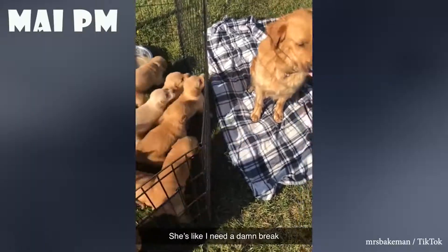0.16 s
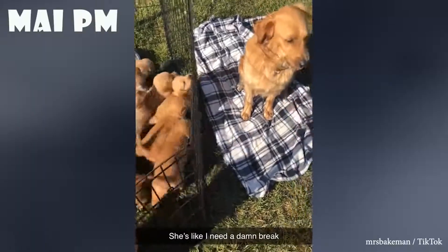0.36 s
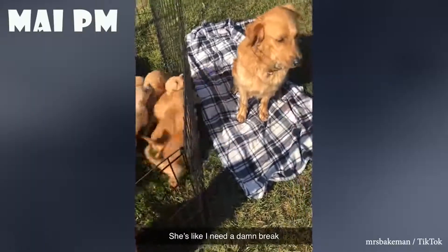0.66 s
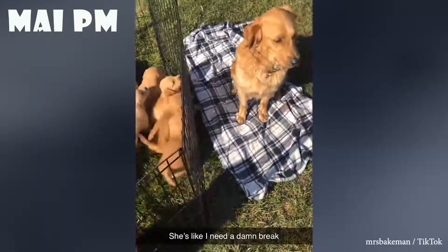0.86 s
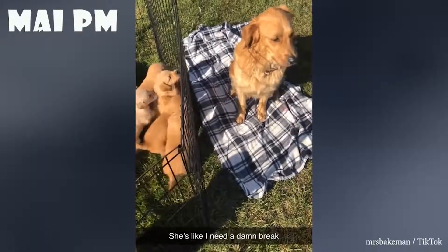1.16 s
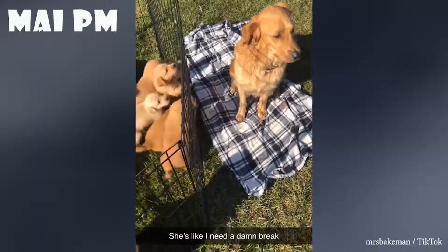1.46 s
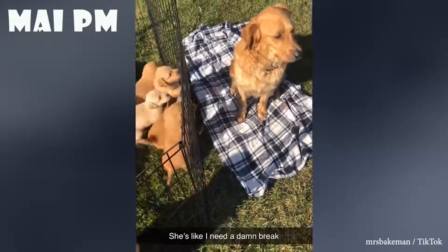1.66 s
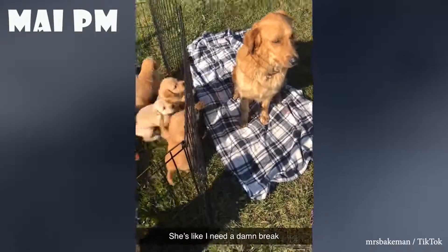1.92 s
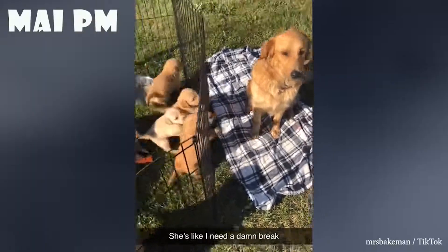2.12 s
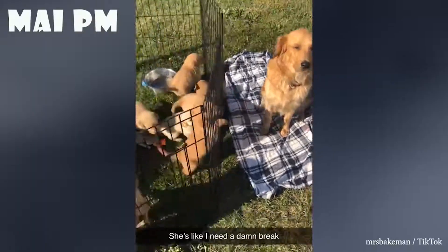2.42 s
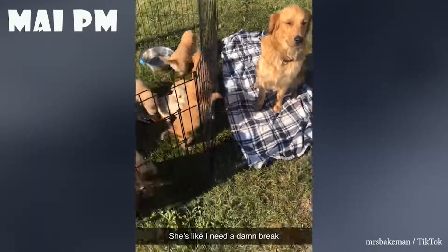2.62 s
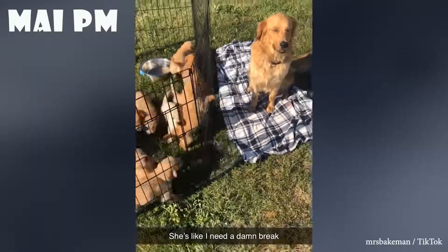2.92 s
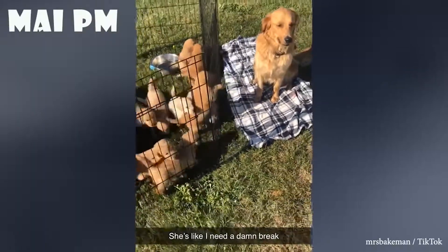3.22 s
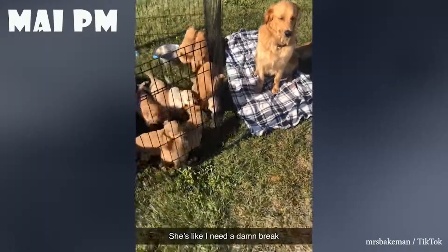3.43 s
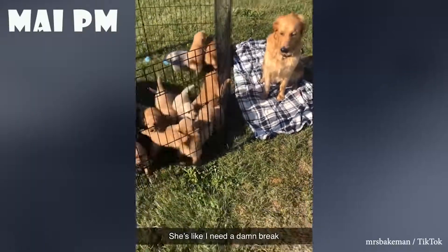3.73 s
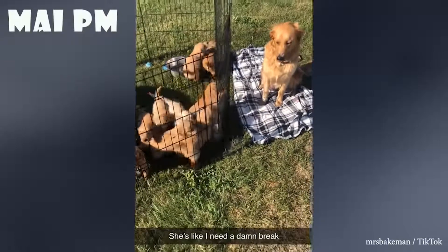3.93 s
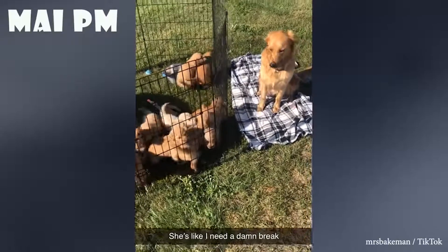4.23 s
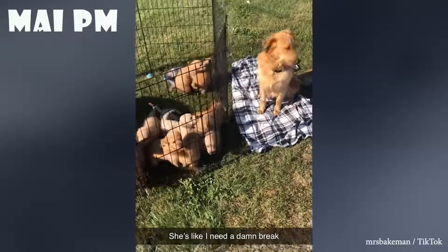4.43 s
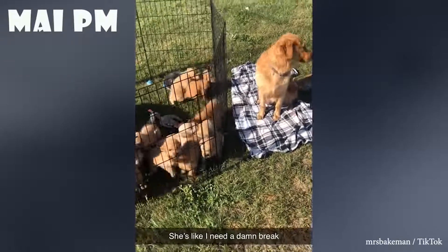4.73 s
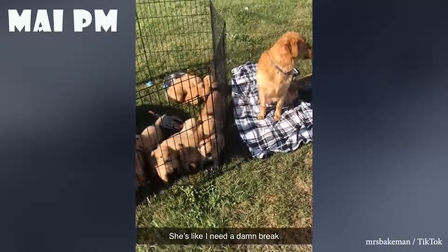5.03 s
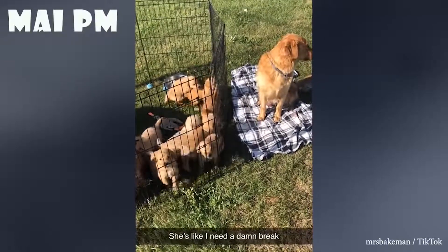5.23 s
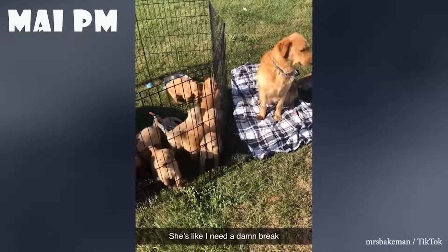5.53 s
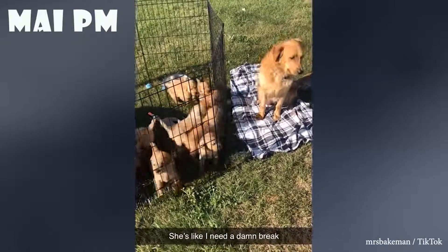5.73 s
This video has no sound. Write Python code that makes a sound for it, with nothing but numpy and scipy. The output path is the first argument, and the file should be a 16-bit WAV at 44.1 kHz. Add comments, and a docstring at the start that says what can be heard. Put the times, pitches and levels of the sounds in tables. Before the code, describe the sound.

Outdoors, close to a wire pen, a handheld microphone picks up overlapping puppy squeaks and whimpers. Whines crowd together early, grow louder and hoarser at about two and a half seconds, then continue in longer plaintive cries. Thin, very high nasal whistles, breathy hiss and muffled pawing sit beneath, with quiet lawn ambience, light wind buffeting and a late thump with a scrape.

```python
"""A litter of puppies whines in a wire pen on a lawn, several at a time, with softer whimpers behind. Each
whine is a near-pure arch of pitch that gains overtones as the mouth opens; some rasp into rattling noise, and
thin second tones of the voice, very high and wavering, sound among them. High breathy noise hisses through
their noses and paws shuffle dully; near the end damped tones thump and noise scrapes close by. Low noise bumps
the microphone in gusts over the steady hush of the lawn."""
import sys
import numpy as np
from scipy import signal
from scipy.fft import rfft, irfft, next_fast_len
from scipy.io import wavfile
from scipy.ndimage import uniform_filter1d

SR = 44100
rng = np.random.default_rng(int(sys.argv[2]) if len(sys.argv) > 2 else 0)


def waveform_to_disk(signal):
    """Save audio, clipped to [-1, 1], as 16-bit WAV at the path in sys.argv[1]."""
    frames = np.transpose(np.atleast_2d(signal))
    scaled = np.clip(frames, -1, 1) * 32767
    samples = np.round(scaled).astype(np.int16)
    wavfile.write(sys.argv[1], SR, samples)


N = 258778
TIME = np.arange(N) / SR  # s

# Outdoor hush of the lawn. Each row: frequency in Hz, relative density in dB per Hz.
LAWN_COLOUR = [(30, 15), (250, 8), (550, 2), (1200, -2), (1900, 0), (2550, -12.5), (3300, -6), (4300, -1),
               (6500, -9), (9500, -62), (13000, -30)]
# Wind at the microphone. Each row: frequency in Hz, relative density in dB per Hz.
WIND_COLOUR = [(15, -14), (35, 3), (70, 0.5), (110, -7.5), (170, -21), (300, -44.5), (700, -71),
               (2000, -100)]
# Gusts on the microphone. Each row: start in seconds, length in seconds, level in dB.
GUSTS = [(.02, 0.24, -34), (.36, 0.31, -37), (.72, 0.15, -32), (1.04, 0.16, -38.5), (1.26, 0.51, -33),
         (1.7, .21, -37.5), (2.26, 0.16, -41.5), (2.65, 0.11, -35.5), (2.84, 0.11, -31), (2.98, 0.2, -47),
         (3.46, 0.12, -47.5), (4.84, 0.066, -32), (5.05, .14, -34), (5.19, 0.2, -41.5), (5.79, 0.11, -45)]
CALM_DB, GUST_EDGE_S = -55, 0.075  # the breeze between gusts; how long a gust takes to swell and fade

# Paws on the ground. Each row: frequency in Hz, relative density in dB per Hz.
SHUFFLE_COLOUR = [(100, -2.5), (250, -11.0), (520, 3.0), (900, -3), (2500, -30.0)]
# Bouts of shuffling paws. Each row: start in seconds, length in seconds, level in dB.
SHUFFLES = [(.25, 0.76, -57.5), (1.8, 0.37, -55), (2.75, 0.5, -55.5), (3.3, 0.54, -62.5), (4.1, 0.56, -55),
            (5.56, 0.44, -53)]
FAINT_SHUFFLE_DB, SHUFFLE_EDGE_S = -66.5, 0.1
# Breath through the puppies' noses. Each row: frequency in Hz, relative density in dB per Hz.
NOSE_HISS_COLOUR = [(2500, -30), (4000, -19), (6500, 6), (9500, 7), (11500, 6), (13000, -1)]
# Swells of high breathy hiss through the noses.
# Each row: start in seconds, length in seconds, level in dB before the trim.
NOSE_HISSES = [(0, 0.18, -46.5), (.19, 0.11, -46.5), (.47, 0.23, -44.5), (.89, 0.32, -48),
               (1.25, 0.44, -48.5), (1.85, 0.14, -46.5), (2.15, 0.19, -41.5), (2.33, 0.25, -53),
               (2.84, 0.083, -44), (3.1, 0.12, -48.5), (3.42, 0.14, -44.5), (3.75, 0.12, -61),
               (4.1, 0.16, -45), (4.42, 0.08, -45), (4.7, .14, -41.5), (5.03, 0.18, -42), (5.38, 0.17, -47),
               (5.55, 0.3, -47.5)]
FAINT_NOSE_HISS_DB, NOSE_HISS_EDGE_S = -56.5, 0.066  # the resting level is before the trim too

# The scrape close by. Each row: frequency in Hz, relative density in dB per Hz.
SCRAPE_COLOUR = [(150, -5.5), (500, 10.5), (800, 1), (1800, -4.5), (3000, -11.5), (5200, 3.5), (7000, -2.5),
                 (9000, 0), (13000, -8.5)]
# The scrape's force. Each row: time in seconds, mean level in dB.
SCRAPE_FORCE = [(5.775, -57), (5.79, -25), (5.81, -19.5), (5.84, -28.5), (5.87, -28.5)]
# Dull thumps. Each row: start in seconds, level in dB before the soft attack, pitch in Hz, 60 dB decay in seconds.
THUMPS = [(5.752, -4.5, 274, 0.068), (5.789, -21.5, 258, 0.25), (5.803, -7, 780, 0.035),
          (5.806, -18, 538, 0.086)]

# Thin, very high second tones of the voice. Each row: start in seconds, length in seconds, settled pitch in Hz,
# mean level in dB.
WHISTLES = [(0.134, 0.031, 8180, -32.5), (0.422, 0.097, 9960, -43), (0.643, 0.034, 8240, -41.5),
            (2.122, 0.23, 9620, -46.5), (2.733, 0.055, 8370, -36), (2.812, 0.051, 8280, -35),
            (2.894, 0.022, 8160, -44), (4.036, 0.048, 9700, -51.5), (5.588, 0.052, 9570, -41),
            (5.634, 0.076, 7970, -43.5)]
# Hoarse moments. Each row: middle in seconds, length in seconds, noise level in dB at the middle.
RASPS = [(0.773, 0.072, -50), (1.075, 0.098, -50), (1.455, 0.071, -43), (1.965, 0.11, -36.5),
         (2.567, 0.085, -35), (2.95, 0.13, -36), (3.089, 0.083, -41.5), (3.374, 0.16, -35.5),
         (3.72, 0.09, -38.5), (4.089, 0.15, -46), (4.439, 0.18, -46), (4.569, 0.067, -45),
         (5.685, 0.13, -45)]
# The colour of a rasp. Each row: frequency in Hz, relative density in dB per Hz.
HOARSE_COLOUR = [(400, -6), (800, -5), (1200, 4), (1650, -1.5), (2100, 7), (2550, -6.5), (3300, -1),
                 (4000, -0.5), (4900, -10.5), (5900, -22), (7500, -27)]
RASP_BEND = 2.13  # how gently a rasp swells and fades

# The whines. Each row: start in seconds, length in seconds, rise in seconds, first pitch in Hz, crest in Hz,
# sagged pitch in Hz, final drop as a share of the pitch, hardest push in seconds after the start,
# fundamental in dB, its gain in the push in dB, widest mouth in seconds after the start,
# overtones in dB, their gain then in dB, nasal treble in dB. Onset, fade and trims come on top.
WHINES = [(-0.028, 0.16, 0.042, 1585, 1348, 1400, 0.085, 0.035, -28, 8, 0.004, -54, 6, 0),
          (-0.01, 0.092, 0.074, 1125, 1233, 1190, 0.071, 0.095, -37, 14.5, 0, -52.5, 3, 2),
          (0.144, 0.13, 0.12, 970, 1275, 1214, 0, 0.112, -34, 2.5, 0.106, -53, 10.5, 9),
          (0.179, 0.074, 0.015, 1132, 1195, 952, 0.0, 0.077, -36.5, 13, 0.074, -72, 3, 0),
          (0.253, 0.4, 0.102, 921, 1393, 1445, 0.12, 0.003, -28.5, 5.5, 0.3, -53.5, 8.5, 8.5),
          (0.296, 0.1, 0.029, 988, 734, 454, 0.017, 0.0, -39, 9, 0.018, -69, 17, 0),
          (0.389, 0.067, 0.067, 1120, 1535, 1400, 0.072, 0.0, -31.5, 6.5, 0.082, -61, 9, 0),
          (0.428, 0.25, 0.11, 1071, 1467, 1436, 0.22, 0.066, -32, 9.5, 0.069, -52.5, 11.5, 14),
          (0.486, 0.18, 0.11, 825, 1084, 980, 0.047, 0.2, -34.5, 2, 0.077, -72, 9, 0),
          (0.709, 0.19, 0.13, 1036, 1527, 1466, 0.36, 0.093, -35, 14, 0.066, -59.5, 19.5, -10),
          (0.765, 0.041, 0.047, 922, 1292, 1166, 0.0049, 0.023, -30, 3, 0, -62, 27, -2),
          (0.835, 0.19, 0.11, 1072, 1559, 1480, 0.19, 0.078, -24, 1, 0.03, -48, 6, 10),
          (0.892, 0.32, 0.21, 1135, 1350, 1281, 0.3, 0.19, -31, 7, 0.14, -60.5, 15.5, 15.5),
          (0.893, 0.29, 0.053, 1598, 1820, 1297, 0, 0.19, -36.5, 10, 0.072, -51.5, 8, 6),
          (0.906, 0.098, 0.054, 895, 1180, 1095, 0.044, 0, -50, 20, 0.055, -67, 0, 0),
          (1.028, 0.079, 0.068, 1019, 1349, 1214, 0.034, 0, -28, 5, 0.043, -55.5, 14, -5),
          (1.144, 0.027, 0.018, 1260, 1187, 894, 0.18, 0.022, -35, 6.5, 0.03, -63, 2, 0),
          (1.207, 0.19, 0.12, 1192, 1615, 1634, 0.32, 0.13, -28.5, 5.5, 0.076, -48.5, -1.5, 2.5),
          (1.269, 0.29, 0.2, 1085, 1620, 1675, 0.34, 0.15, -33, 10.5, 0.201, -58, 3, 2),
          (1.332, 0.082, 0.054, 901, 1220, 1086, 0.0, 0.082, -37.5, 12, 0.14, -67, -1, 0),
          (1.368, 0.41, 0.18, 971, 1586, 1380, 0.41, 0, -34, 8.5, 0.052, -52, 12.5, 8),
          (1.433, 0.24, 0.17, 1164, 1549, 1158, 0.23, 0.17, -37.5, 17, 0.19, -57, 10.5, 2),
          (1.558, 0.069, 0.056, 1013, 1163, 1030, 0, 0.044, -32.5, 3, 0.064, -60, 7, 3),
          (1.608, 0.061, 0.066, 800, 1047, 957, 0.016, 0.0695, -32.5, 16.5, 0.067, -61, 19, 0),
          (1.787, 0.27, 0.13, 995, 1596, 1243, 0.21, 0.13, -25, 4, 0.22, -47, 10.5, -5),
          (1.918, 0.12, 0.13, 1113, 1486, 1600, 0.0, 0.035, -27, 10, 0.059, -35.5, 5, 4),
          (2.019, 0.49, 0.17, 1540, 1577, 1259, 0.14, 0.29, -35, 10, 0.26, -50, 3.5, 7.5),
          (2.111, 0.13, 0.13, 1038, 1352, 1500, 0.36, 0.043, -31.5, 7, 0.031, -54.5, 9.5, 0),
          (2.178, 0.21, 0.08, 1010, 1441, 1380, 0.022, 0.04, -34.5, 20, 0.048, -62.5, 32.5, 16),
          (2.27, 0.13, 0.13, 1139, 1394, 1246, 0.066, 0.13, -36, 8, 0.065, -59, 2, 0),
          (2.378, 0.019, 0.006, 1164, 1098, 1020, 0.075, 0, -37, 8, 0.036, -42.5, 15, 2),
          (2.404, 0.046, 0.027, 1366, 1353, 1200, 0.034, 0.037, -31, 4.5, 0.048, -53, 12, 10),
          (2.405, 0.17, 0.12, 925, 1232, 1165, 0.0, 0.056, -37.5, 5, 0.174, -52, 14, 9),
          (2.461, 0.11, 0.069, 936, 992, 1074, 0.026, 0.087, -37.5, 7, 0.121, -49.5, 32, 7),
          (2.558, 0.23, 0.11, 939, 1410, 1250, 0.0, 0.094, -19.5, 5, 0.048, -33.5, 13, -1.5),
          (2.663, 0.086, 0.056, 893, 1165, 1000, 0.19, 0.046, -31, 3.5, 0.096, -68.5, 32, 8),
          (2.772, 0.19, 0.22, 1052, 1214, 1250, 0.0, 0.22, -35, 2, 0.11, -50.5, 4.5, -2),
          (2.773, 0.068, 0.091, 1268, 1378, 1250, 0.0, 0.00096, -30, 14, 0.01, -49.5, 17.5, -8),
          (2.92, 0.131, 0.082, 1240, 1440, 1405, 0.049, 0.27, -44, 5, 0.075, -36, -6, -26),
          (3.027, 0.25, 0.14, 900, 1454, 1384, 0.0, 0.035, -33.5, 12, 0.048, -47.5, 23.5, -15),
          (3.068, 0.13, 0.13, 632, 913, 830, 0.1, 0.045, -33, -0.5, 0.058, -56.5, 9, 0),
          (3.296, 0.19, 0.15, 1003, 1392, 1486, 0.16, 0.076, -39, 14, 0.081, -46, 12.5, -8),
          (3.371, 0.2, 0.06, 890, 1140, 1009, 0.0, 0.02, -39, 5, 0.0, -52.5, 11, -3),
          (3.379, 0.072, 0.026, 380, 391, 257, 0.15, 0.071, -41.5, 9, 0.053, -50, 8, 0),
          (3.433, 0.095, 0.044, 802, 950, 933, 0.11, 0, -38, 6, 0.11, -53, 16, 0),
          (3.527, 0.25, 0.087, 973, 1377, 1250, 0.0, 0.026, -29.5, 9.5, 0.024, -49.5, 14.5, -15),
          (3.653, 0.21, 0.15, 1058, 1417, 1187, 0.16, 0.06, -29.5, 14, 0.05, -54, 22, 4),
          (3.717, 0.21, 0.01, 1307, 1158, 1110, 0.054, 0.14, -39, 2.5, 0.23, -57.5, 15, 0),
          (3.735, 0.21, 0.09, 1283, 1452, 1407, 0.15, 0.085, -66, 3, 0.003, -46.5, 17.5, 3),
          (3.741, 0.077, 0.039, 938, 885, 740, 0, 0.029, -35.5, 3, 0.002, -57, 9, 0),
          (3.947, 0.29, 0.14, 874, 1378, 856, 0.0, 0.236, -39, 1, 0.011, -50.5, 4, -28),
          (4.024, 0.23, 0.13, 883, 1523, 1470, 0.0, 0.04, -36.5, 11, 0.033, -53, 11.5, 2),
          (4.027, 0.2, 0.19, 1069, 1226, 1040, 0.02, 0.026, -33.5, 5, 0.17, -52.5, 12, -2),
          (4.202, 0.14, 0.071, 1404, 1590, 1170, 0.19, 0.12, -36, 4.5, 0.069, -60, 9, -8),
          (4.341, 0.1, 0.051, 1012, 1347, 1335, 0.22, 0.022, -40.5, 7, 0.042, -59, 8, 5),
          (4.399, 0.11, 0.076, 924, 1221, 1040, 0.21, 0.066, -35.5, 5.5, 0.0, -46.5, 9, 7),
          (4.501, 0.43, 0.24, 1039, 1659, 1285, 0.03, 0.0, -32, 10, 0.23, -45, 15, -7),
          (4.523, 0.073, 0.087, 1132, 1384, 1323, 0.035, 0, -42, 21.5, 0.014, -39, 13, 1),
          (4.587, 0.24, 0.2, 1077, 1298, 1290, 0.38, 0.18, -35.5, 7, 0.2, -54, 11.5, 12),
          (4.868, 0.42, 0.15, 920, 1185, 929, 0.14, 0.17, -33.5, 2, 0.172, -57.5, -1, -3),
          (5.003, 0.15, 0.078, 1027, 1395, 1456, 0.52, 0.088, -32, 5.5, 0.03, -48.5, 2, 6),
          (5.099, 0.33, 0.16, 1003, 1231, 1110, 0.25, 0.12, -33, 2.5, 0.12, -53, 4, 1),
          (5.355, 0.17, 0.1, 1024, 1403, 1261, 0.13, 0.023, -22.5, -4, 0.046, -42.5, 5.5, 14.5),
          (5.523, 0.14, 0.088, 464, 746, 656, 0.19, 0.069, -39, 4, 0.08, -45.5, 4, 0),
          (5.612, 0.13, 0.07, 214, 448, 463, 0.041, 0.039, -47, 14, 0.13, -46, 10, 0),
          (5.715, 0.18, 0.11, 883, 1367, 1315, 0.037, 0.12, -27.5, 4.5, 0.13, -40.5, 6.5, 22)]
# The throat's colour on the overtones, mouth nearly shut. Each row: frequency in Hz, relative gain in dB.
SHUT_THROAT = [(1800, 9), (2150, 0.5), (2500, -10.5), (3050, -2), (4200, 0), (5300, -2), (6700, -4),
               (9500, -5), (13000, -13)]
# The throat's colour added as the mouth opens. Each row: frequency in Hz, relative gain in dB.
OPEN_THROAT = [(1800, -4), (2150, -1.5), (2500, 5.5), (3100, 8), (3800, 3), (5300, -5), (6700, -11),
               (8000, -14), (13000, -87)]
# Air hissing past the folds. Each row: frequency in Hz, relative density in dB per Hz.
AIR_COLOUR = [(600, 2), (1200, -9), (2000, 17), (2550, -60), (3400, -18), (4400, 17), (6500, 3), (9500, -9),
              (11500, -7), (13000, -5)]
# the pitch climbs in an S, sags ever faster and falls away at the very end
RISE_BEND, SAG_BEND, DROP_S = 1.2, 1.3, .012
# push and open mouth last longer in a long whine
PUSH_S, PUSH_SHARE, OPEN_S, OPEN_SHARE = 0.014, 0.11, 0.025, 0.09
# the fundamental is strongest on the throat's first resonance
LOUDEST_HZ, OFF_DB_PER_OCTAVE, OFF_LIMIT_DB = 1263, 23.5, 8
ONSET_DB, ONSET_S, FADE_DB, FADE_S = 6.5, 0.031, 1, 0.045  # every whine swells in and fades out
CLOSE_DB, CLOSE_S = 2.5, 0.021  # the overtones die first as the mouth closes
# high whines ring more through the nose, above NASAL_HZ
NASAL_HZ, NASAL_DB, NASAL_DB_PER_OCTAVE = 5110, 8, 21
EDGE_HZ = 13350  # top of the recorder's band


def gain_of(db):
    """Decibels to gain."""
    return 10 ** (np.asarray(db) / 20)


def evened(x):
    """Scales to rms 1."""
    return x / np.sqrt(np.mean(x ** 2) + 1e-20)


def read(points, hz):
    """A spectrum's value at hz, on a log-frequency axis."""
    f, value = np.transpose(points)
    return np.interp(np.log(hz + 1), np.log(f + 1), value)


def add(mix, s, sound):
    """Mixes a sound in at time s, cut to what fits."""
    start = round(s * SR)
    sound = sound[max(-start, 0):]
    part = mix[max(start, 0):][:len(sound)]
    part += sound[:len(part)]


def noise(points, size):
    """Noise of rms 1 with the given spectrum."""
    colour = gain_of(read(points, np.fft.rfftfreq(size, 1 / SR)))
    return evened(irfft(rfft(rng.standard_normal(size)) * colour, size))


def wander(rate_hz, size):
    """Smooth chance of rms about 1 that changes mostly slower than rate_hz."""
    hz = np.fft.rfftfreq(next_fast_len(size + 4096), 1 / SR)
    spectrum = rfft(rng.standard_normal(2 * len(hz) - 2))
    return evened(irfft(spectrum / (1 + (hz / rate_hz) ** 4)))[:size]


def swells(rows, rest_db, edge_s):
    """A gain that rests low and, for each row, rises, holds and falls; overlaps add in power."""
    power = gain_of(rest_db) ** 2
    for start, length, db in rows:
        inside_s = np.minimum(TIME - start, start + length - TIME)
        power = power + (gain_of(db) * np.clip(.5 + inside_s / edge_s, 0, 1)) ** 2
    return np.sqrt(power)


def lawn(level_db=-55, swell_db=2):
    """Outdoor hush: coloured noise whose level slowly drifts."""
    return gain_of(level_db + swell_db * wander(2.9, N)) * noise(LAWN_COLOUR, N)


def wind(lumps_db=3.0):
    """Low, lumpy buffeting at the microphone that follows the gusts."""
    lumps = gain_of(lumps_db * wander(21, N))
    return swells(GUSTS, CALM_DB, GUST_EDGE_S) * lumps * noise(WIND_COLOUR, N)


def shuffle(steps_db=5):
    """Paws shuffle dully on the ground: low noise in bouts, its level uneven."""
    steps = gain_of(steps_db * wander(29.5, N))
    return noise(SHUFFLE_COLOUR, N) * swells(SHUFFLES, FAINT_SHUFFLE_DB, SHUFFLE_EDGE_S) * steps


def bump(rise_s=0.0087):
    """Something hollow is knocked close by and scrapes along: damped tones with a soft attack, and noise."""
    force_db = np.interp(TIME, *np.transpose(SCRAPE_FORCE), left=-120)
    out = gain_of(force_db + 2 * wander(200, N)) * noise(SCRAPE_COLOUR, N)
    t = np.arange(SR // 4) / SR
    attack = 1 - np.exp(-(t / rise_s) ** 2)
    for s, db, hz, t60 in THUMPS:
        add(out, s, gain_of(db - 60 * t / t60) * attack * np.sin(2 * np.pi * hz * t))
    return out


def yard(x, t60=0.31, wet_db=-19):
    """Faint, short scatter from the ground and the things around: sparse, decaying random echoes."""
    t = np.arange(SR // 3) / SR
    sparse = (rng.random(len(t)) < .04) * (t > .004)
    taps = rng.standard_normal(len(t)) * sparse * gain_of(-60 * t / t60)
    return x + gain_of(wet_db) * signal.fftconvolve(x, taps / np.linalg.norm(taps))[:N]


def nose_hiss(trim_db=-5.0, flicker_db=3.0):
    """High breathy hiss through the puppies' noses: noise that swells and flickers."""
    flicker = gain_of(trim_db + flicker_db * wander(140, N))
    return noise(NOSE_HISS_COLOUR, N) * swells(NOSE_HISSES, FAINT_NOSE_HISS_DB, NOSE_HISS_EDGE_S) * flicker


def far_whines(count=22, level_db=-50, over_db=-64, low_hz=800, high_hz=1350):
    """Short, soft whimpers from the puppies at the back of the heap, one at a chance moment of each slot."""
    out = np.zeros(N)
    for k, (when, length, pitch, skew) in enumerate(rng.random((count, 4))):
        lift = np.sin(np.pi * np.linspace(0, 1, 7) ** (.5 + skew))
        s = (k + when) / count * TIME[-1] + np.linspace(0, .05 + 0.067 * length, 7)
        hz = (low_hz + pitch * (high_hz - low_hz)) * (.8 + 0.26 * lift)
        fall_db = 5 * (lift - 1)
        add(out, *whine(np.c_[s, hz, level_db + fall_db, over_db + fall_db], 0))
    return out


def whistles(drop=.13, settle_s=0.00575, waver=0.0055):
    """A second, very high tone that falls onto its pitch and wavers."""
    out = np.zeros(N)
    for s, length, hz, db in WHISTLES:
        t = np.arange(int(length * SR)) / SR
        pitch = hz * (1 + drop * np.exp(-t / settle_s) + waver * wander(82, len(t)))
        swell = signal.windows.tukey(len(t), .3) * gain_of(db + 4.2 * wander(35, len(t)))
        add(out, s, swell * np.sin(2 * np.pi * np.cumsum(pitch) / SR))
    return out


def rasp(voices, grain=0.088, shake=0.12):
    """The folds break into chaos: the tone shakes and rattling noise comes through the open throat."""
    out = voices.copy()
    for s, length, db in RASPS:
        size, start = int(length * SR), s - length / 2
        swell = abs(np.sin(np.linspace(0, np.pi, size))) ** RASP_BEND
        rattle = wander(220, size)
        shaken = shake * rattle * voices[round(start * SR):][:size]
        hoarse = gain_of(db) * evened(noise(HOARSE_COLOUR, size) * np.exp(grain * rattle))
        add(out, start, swell * (shaken + hoarse))
    return out


def arch(start, length, rise, first_hz, crest_hz, sagged_hz, drop, push_at, tone_db, tone_push_db,
         open_at, over_db, over_open_db):
    """One whine's course, as rows (s, pitch Hz, fundamental dB, overtones dB): climb, sag, drop, push, opening."""
    t = np.linspace(0, length, 150)
    climb = np.sin(np.pi / 2 * np.clip(t / rise, 0, 1) ** RISE_BEND)
    sag = np.clip((t - rise) / max(length - rise, .01), 0, 1) ** SAG_BEND
    hz = first_hz + (crest_hz - first_hz) * climb + (sagged_hz - crest_hz) * sag
    hz *= 1 - drop * np.exp((t - length) / DROP_S)
    push = np.exp(-((t - push_at) / (PUSH_S + PUSH_SHARE * length)) ** 2)
    opening = np.exp(-((t - open_at) / (OPEN_S + OPEN_SHARE * length)) ** 2)
    closing_db = CLOSE_DB * np.exp((t - length) / CLOSE_S)
    ends_db = ONSET_DB * np.exp(-t / ONSET_S) + FADE_DB * np.exp((t - length) / FADE_S)
    off_db = np.minimum(OFF_DB_PER_OCTAVE * abs(np.log2(hz / LOUDEST_HZ)), OFF_LIMIT_DB)
    fundamental_db = tone_db + tone_push_db * push - off_db - ends_db
    overtones_db = over_db + over_open_db * opening - ends_db - closing_db
    return np.c_[start + t, hz, fundamental_db, overtones_db]


def whine(rows, nose_db, jitter=0.0061, rasp_jitter=0.0077, shimmer=0.17, flutter_db=3,
          shut_db=-48, open_db=-34, overtones_trim_db=-1, air_db=-17, open_air_db=-5):
    """Tight vocal folds give a strong fundamental; the overtones sweep through the throat's resonances."""
    s, *columns = np.transpose(rows)
    t = np.arange(s[0] - .012, s[-1] + .005, 1 / SR)
    hz, level_db, over_db = (uniform_filter1d(np.interp(t, s, c), size=300) for c in columns)
    size = len(t)
    # strong overtones mean an open mouth: 0 nearly shut, 1 wide open
    mouth = np.clip((over_db - shut_db) / (open_db - shut_db), 0, 1)
    # the folds beat unevenly, more so with the mouth open
    unevenness = jitter * wander(73, size) + rasp_jitter * mouth * wander(380, size)
    turns = np.cumsum(hz * (1 + unevenness)) / SR
    fundamental = np.sin(2 * np.pi * turns)

    orders = np.arange(2, 12)[:, None]
    over_hz = orders * hz
    # the shut colour counts three times, falling to twice as the open colour joins
    throat = gain_of((3.0 - mouth) * read(SHUT_THROAT, over_hz) + mouth * read(OPEN_THROAT, over_hz))
    throat /= np.sqrt((throat[:4] ** 2).sum(0))
    nasal = np.clip(np.log2(over_hz / NASAL_HZ), 0, 2) ** 1.2
    throat *= gain_of(nasal * (NASAL_DB + nose_db + NASAL_DB_PER_OCTAVE * np.log2(hz / 1500)))
    flutter = gain_of(flutter_db * np.array([wander(27.4, size) for _ in orders]))
    partials = np.sin(2 * np.pi * orders * (turns + 0.1065 * orders))
    overtones = (throat * flutter * partials).sum(0)

    # the hiss stops growing once the mouth is open
    hiss_db = np.minimum(over_db, open_db) + air_db + open_air_db * mouth
    hiss = gain_of(hiss_db) * noise(AIR_COLOUR, size)
    voice = gain_of(level_db) * fundamental + gain_of(over_db + overtones_trim_db) * overtones + hiss
    # the folds take a moment to start and stop quickly
    edges = np.clip(np.minimum((t - t[0]) / .022, (t[-1] - t) / .008), 0, 1)
    loudness = (1 + shimmer * wander(97, size)) * np.sin(edges * np.pi / 2) ** 2
    return t[0], np.sqrt(2) * voice * loudness


def scene():
    """The litter and its small noises on the lawn, with wind at the microphone."""
    voices = far_whines()
    for *course, nose_db in WHINES:
        add(voices, *whine(arch(*course), nose_db))
    scattered = yard(rasp(voices) + whistles() + bump())
    return (scattered + wind() + lawn() + shuffle() + nose_hiss())[None]


def record(dry):
    """The recorder's band limit: a steep low-pass at EDGE_HZ."""
    band = signal.firwin(511, EDGE_HZ, window=("kaiser", 9), fs=SR)
    return signal.oaconvolve(dry, band[None], "same")


dry = scene()
out = record(dry)
waveform_to_disk(out)
```